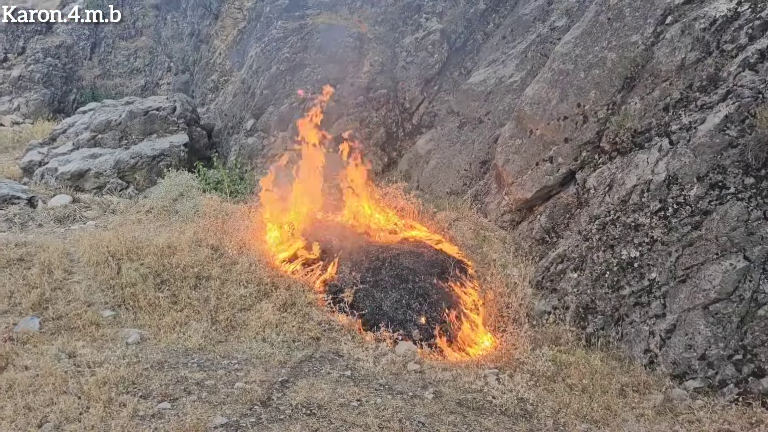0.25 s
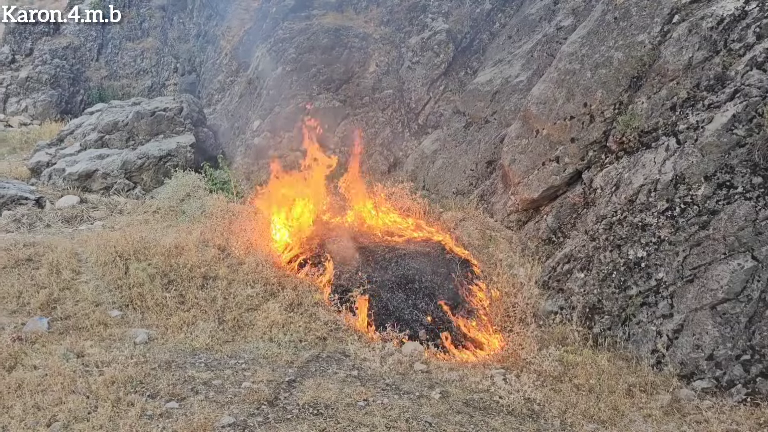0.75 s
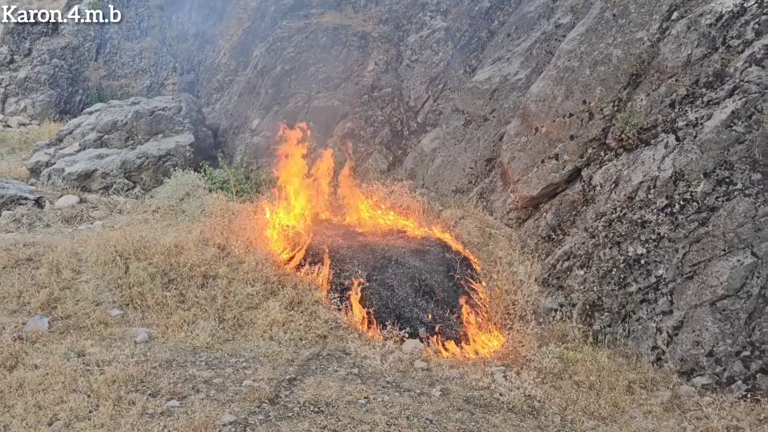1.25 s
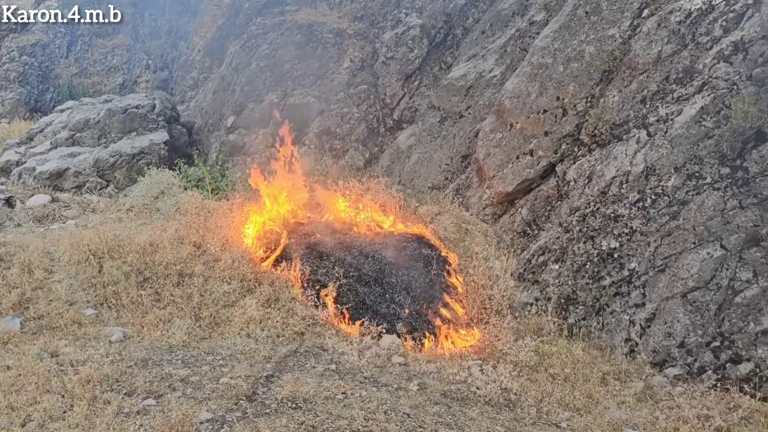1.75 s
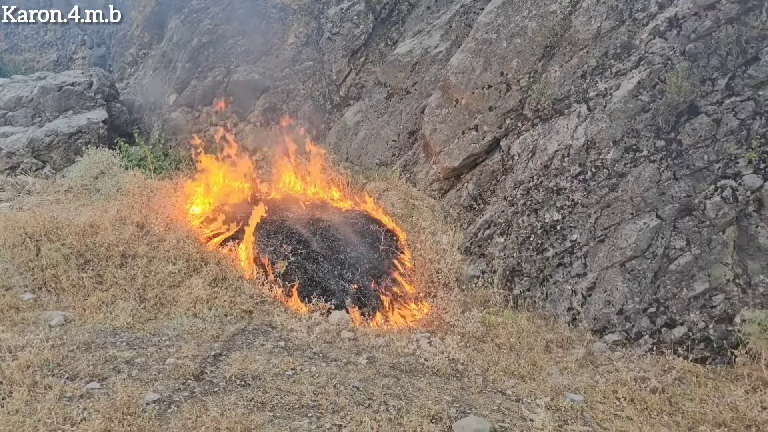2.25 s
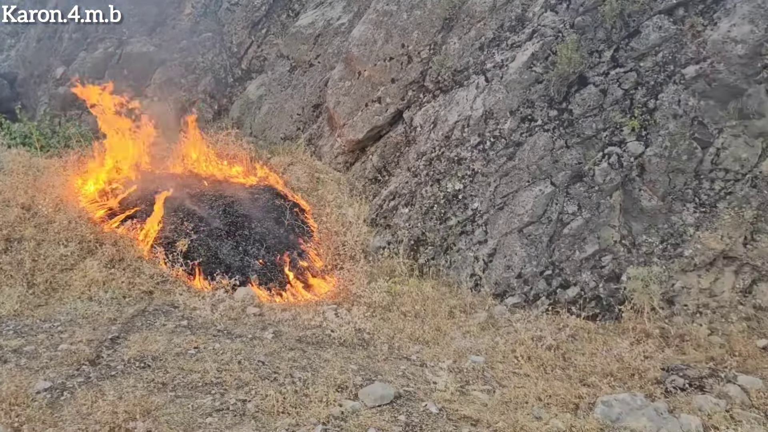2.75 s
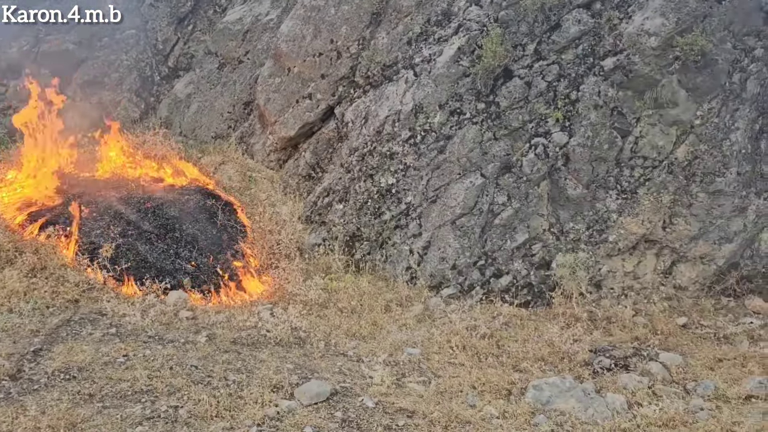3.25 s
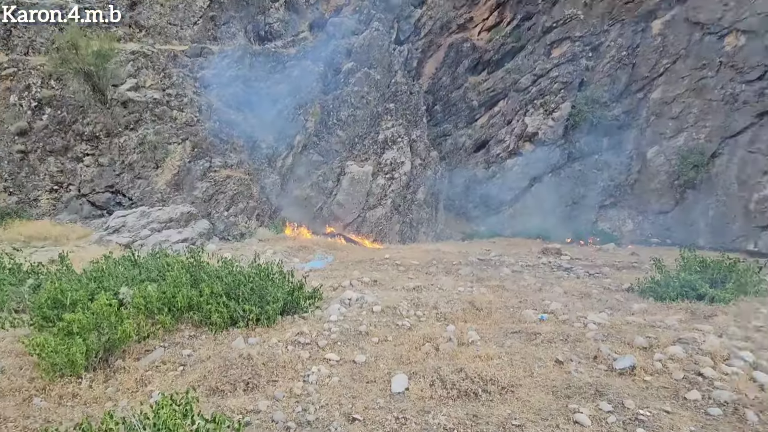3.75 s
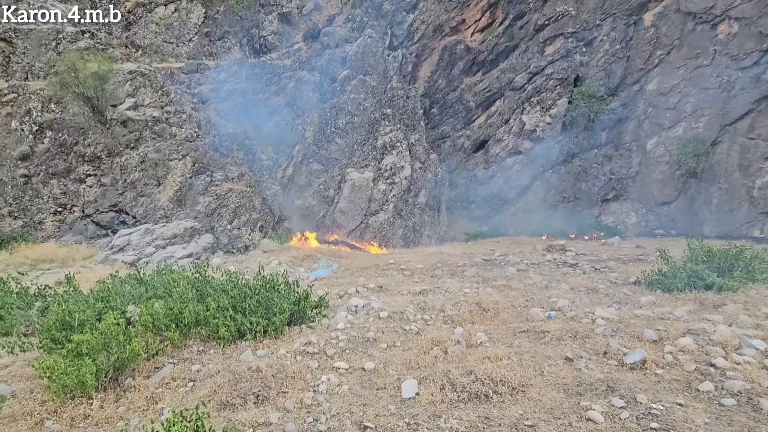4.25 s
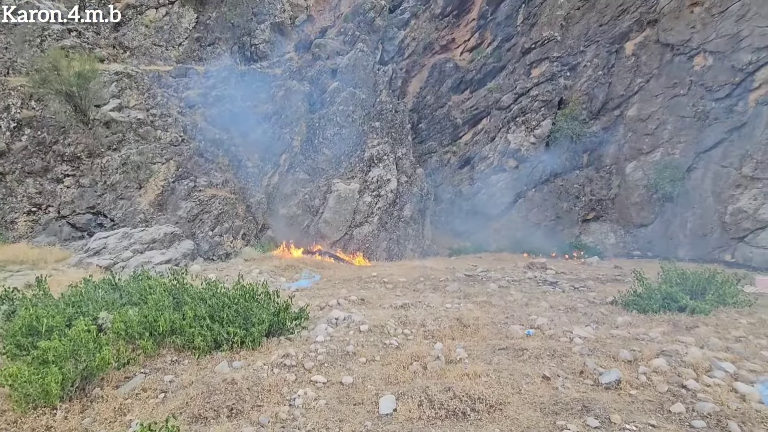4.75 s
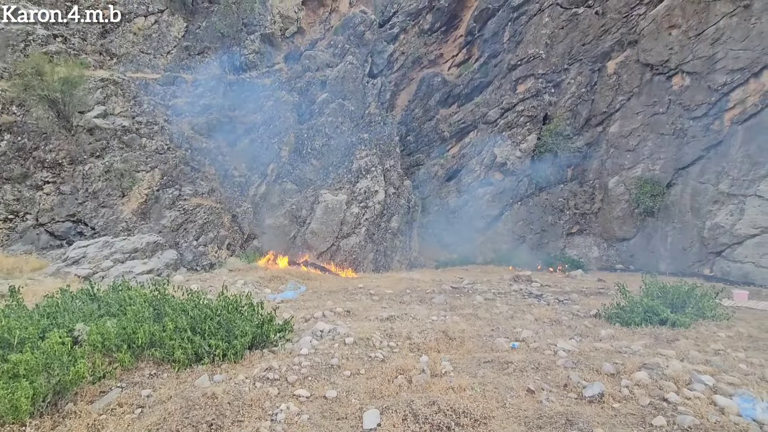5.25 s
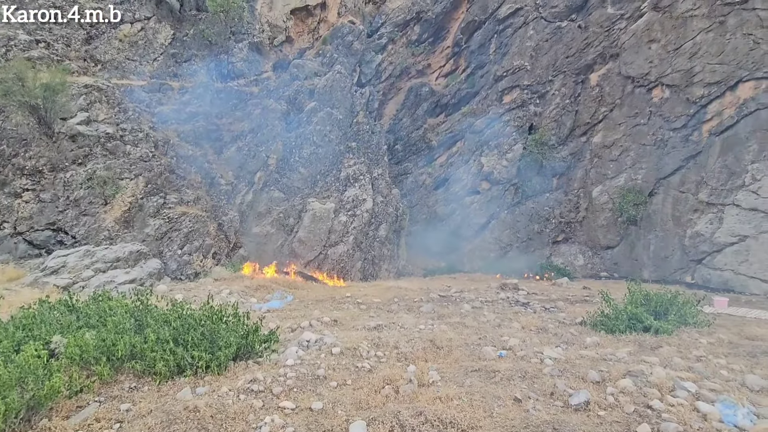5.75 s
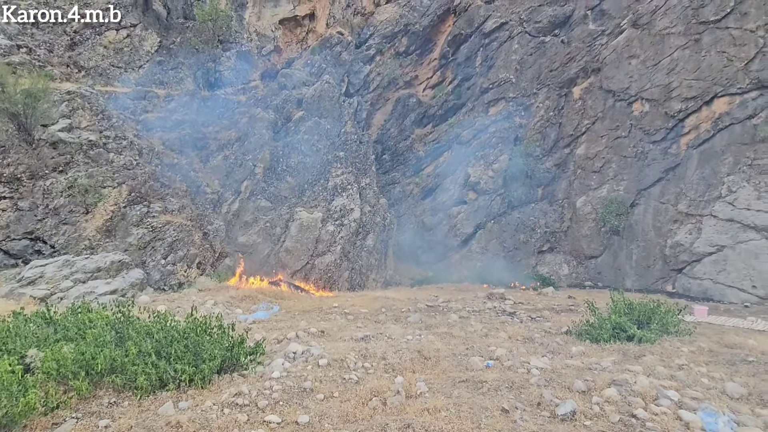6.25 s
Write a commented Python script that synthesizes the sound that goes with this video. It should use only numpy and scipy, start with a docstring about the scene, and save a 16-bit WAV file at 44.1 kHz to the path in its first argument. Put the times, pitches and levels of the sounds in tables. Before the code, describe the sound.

From 0 to about 3.6 seconds, dry grass burns a few steps away: a continuous fizz of tiny snaps, larger clumpy crackles and many loud single pops, some bright and ticking, others duller. Notable pops come near 0.2, 1.8, 2.2 and 2.9 seconds; brief sizzles swell near 0.3, 1.0, 2.7 and 3.3. A soft rush of air lies behind, while low wind rumbles and thumps the microphone, stronger around 1.9 and 3.2. At 3.6 everything falls silent for under a tenth of a second. From 3.7 to 6.5 the fire is distant, quieter and duller, with sparse small pops, ragged echoes from the rock and a fluttering steam hiss that swells around 5.15. Gusts bump near 4.2, 4.6 and 5.3. The crackle brightens after 5.3, one strong pop cracks at 5.84, and a smaller one comes just before the end.

```python
"""Burning dry grass at a rock face

A patch of dry grass burns at the foot of a rock face, heard from a few steps away and,
after a short silent cut, from far off. Heated stalks burst as short bursts of shaped noise:
a fizz of tiny snaps, a crackle of larger ones, single loud pops and brief sizzling flares.
The rock throws them back as a ragged echo in a diffuse tail; steam hisses in the far view.
Behind them filtered noise makes the soft rush of air, the breeze and gusts on two microphone ports.
"""
import sys
import numpy as np
from scipy import signal
from scipy.fft import rfft, irfft
from scipy.io import wavfile
from scipy.ndimage import uniform_filter1d

SR = 44100
rng = np.random.default_rng(int(sys.argv[2]) if len(sys.argv) > 2 else 0)


def master_out(mix):
    """Clip the mix to full scale and print it as 16-bit PCM to the path in sys.argv[1]."""
    frames = np.transpose(np.atleast_2d(mix))
    ceiling = np.clip(frames, -1, 1)
    pcm = np.round(ceiling * 32767).astype(np.int16)
    wavfile.write(sys.argv[1], SR, pcm)


N = 286650
TIME = np.arange(N) / SR  # s
HZ = np.fft.rfftfreq(N, 1 / SR)


def amp(db):
    """Decibels to gain."""
    return 10 ** (np.asarray(db) / 20)


def unit(x):
    """Scales to an rms of 1."""
    return x / np.sqrt(np.mean(x ** 2) + 1e-20)


def curve(rows):
    """Joins (time [s], value) rows by straight lines."""
    return np.interp(TIME, *np.transpose(rows))


def spectrum(rows, hz):
    """Reads each column of a table on a log-frequency axis."""
    f, *columns = np.transpose(rows)
    return np.array([np.interp(np.log(hz + 1), np.log(f), c) for c in columns])


def colour(x, rows):
    """Filters by a table of (frequency [Hz], gain [dB]), with one gain column or one for each port."""
    return irfft(rfft(x) * amp(spectrum(rows, HZ)), N)


def drift(rate_hz):
    """Slow chance with an rms of 1: noise without its faster part."""
    slow = rfft(rng.standard_normal(N)) * np.exp(-(HZ / rate_hz) ** 2)
    return unit(irfft(slow, N))


def share(a, b, alike):
    """Spectra at two ports: the second takes the part `alike` (0-1) from the first."""
    return np.array([a, alike * a + np.sqrt(1 - alike ** 2) * b])


def noise_pair(alike):
    """White noise at two ports that share a part of it."""
    a, b = rfft(rng.standard_normal((2, N)))
    return irfft(share(a, b, alike), N)


def add(mix, s, sound):
    """Mixes a sound in at time s."""
    part = mix[:, max(round(s * SR), 0):][:, :sound.shape[1]]
    part += sound[:, :part.shape[1]]


GROUND_S, GROUND_ECHO = .00149, 0.48  # bounce off the ground: middling delay [s], strength [gain]


def snap(t60, body_db, top_db, direct=0.26, spike=0.51, size=1024):
    """One stalk bursts: a sharp crack, smeared by straw and stones, and its bounce off the ground."""
    t, hz = np.arange(size) / SR, np.fft.rfftfreq(size, 1 / SR)
    shared, *own = rng.standard_normal((3, size))
    scatter = direct * shared + np.sqrt(1 - direct ** 2) * np.array(own)
    # the stalk tears in fits, so the decay is ragged
    ragged = amp(3 * unit(uniform_filter1d(rng.standard_normal(size), 40)))
    # the first half millisecond comes straight from the stalk to both ports
    crack = spike * shared * np.exp(-(t / .0005) ** 2)
    smear = ragged * scatter * 1e-3 ** (t / max(t60, .001))
    attack = np.minimum(t / .0003, 1)
    burst = rfft((crack + smear) * attack)
    # the crack is broadband; only the stalk colours it
    burst = burst / np.sqrt(uniform_filter1d(abs(burst) ** 2, size=60) + 1e-12)
    stalk = [(150, body_db - 5.5), (1300, body_db), (3800, -1.05), (7000, 1), (11500, top_db)]
    tone = amp(spectrum(stalk, hz))
    lead_in = np.exp(-2j * np.pi * hz * 16 / SR)  # 16 samples of room before the onset
    bounce = 1 + GROUND_ECHO * np.exp(-2j * np.pi * hz * GROUND_S * rng.uniform(.88, 1.12))
    fade_out = np.minimum(4 * (1 - t / t[-1]), 1)
    burst = irfft(burst * tone * (lead_in * bounce)) * fade_out
    return burst / np.sqrt(np.sum(burst ** 2) / 2)


def snaps(per_s, spread_db, cap, t60, clump_db, vary_db=3, count=120):
    """A random shower of snaps of many colours and sizes, coming in clumps as tufts catch."""
    rate = per_s * amp(clump_db * drift(15))
    size = amp(spread_db * np.minimum(rng.exponential(1, N), cap))
    kind = rng.integers(0, count, N)
    out = np.zeros((2, N + SR))
    grains = []
    for body, top, length in rng.standard_normal((count, 3)):
        grains.append(snap(t60 * np.exp(0.076 * length), vary_db * (body - top / 2), vary_db * top))
    for i in np.flatnonzero(rng.random(N) < rate / SR):
        grain = grains[kind[i]]
        out[:, i:i + grain.shape[1]] += size[i] * grain
    return unit(out[:, :N])


# how hard the fire burns close by, before its colour: (time [s], level [dB])
BLAZE_NEAR = [(0, -47.5), (.55, -49.5), (1.56, -50.5), (2.7, -49), (3.15, -50.5), (3.58, -52)]
# colour of the near crackle at each port: (frequency [Hz], left gain [dB], right gain [dB])
COLOUR_NEAR = [(300, -31, -11), (900, 2.5, -7.5), (1370, 1.5, 3), (2200, 1, 3), (3600, 3.5, 4),
               (6040, 1, 6), (8300, 0.5, 2.5), (8960, 1.5, -3.5), (11250, -7, 1.5), (11700, -0.5, 11.5),
               (12100, 3.5, -1), (16000, -1, -0.5)]


def fire_near():
    """Close by, separate snaps stand out of the fizz of the burning blades."""
    fizz = snaps(per_s=1600, spread_db=2.8, cap=3, t60=.005, clump_db=1.8, vary_db=2)
    crackle = snaps(per_s=150, spread_db=4.4, cap=2.3, t60=.007, clump_db=2.8, vary_db=3)
    fire = amp(-1) * fizz + amp(0.66) * crackle
    return amp(curve(BLAZE_NEAR)) * colour(fire, COLOUR_NEAR)


# how hard the fire burns as heard from afar, before its colour: (time [s], level [dB])
BLAZE_FAR = [(3.69, -57.5), (4.2, -60), (5, -55), (5.35, -62), (6.5, -60.5)]
# colour of the far crackle at each port: (frequency [Hz], left gain [dB], right gain [dB])
COLOUR_FAR = [(300, -25, -44), (856, 9, 6.5), (1480, -1, 8), (2580, -9, 5.5), (3600, -3, -2.5),
              (5800, -8, 1.5), (7600, -6, -3), (7960, -7, -7), (10800, -7, -14.5), (11300, -3.5, 3),
              (13100, -7, -9), (16000, -7.5, -7)]
# the layer added on top as the treble opens up towards the end: (frequency [Hz], gain [dB])
LATE_TOP = [(4000, -25), (7400, 1), (9000, 2), (10500, -27), (11800, -7), (13500, 6), (16000, 1)]


def fire_far():
    """From afar the fizz is duller and only the larger snaps carry."""
    fizz = snaps(per_s=2000, spread_db=2.2, cap=3, t60=.01, clump_db=1.5, vary_db=1.5)
    crackle = snaps(per_s=80, spread_db=4.2, cap=2.3, t60=.007, clump_db=3, vary_db=2)
    crackle = colour(crackle, [(1500, -2), (5000, 13.0), (14000, 9)])  # the snaps are thinner than the fizz
    fire = colour(amp(3.0) * fizz + amp(-3.5) * crackle, COLOUR_FAR)
    # towards the end the flames stand higher and the top of the crackle brightens
    risen = curve([(5.25, 0), (5.6, 1)])
    return amp(curve(BLAZE_FAR)) * (fire + risen * colour(fire, LATE_TOP))


# loud pops of bursting stalks, thin ones bright and thick ones dull, levels over POP_S before port colour:
# (time [s], level [dB], brightness [dB])
POPS = [(0.0515, -37.5, -5), (.064, -34, 13), (.072, -35.5, 0), (0.087, -33.5, 6), (.11, -38, 8),
        (0.1886, -31, 7), (.361, -38.5, 1), (0.4129, -32, -31), (.495, -34.5, 15), (0.8604, -39, -21),
        (0.993, -34, 1), (1.0532, -38, 0), (1.1257, -37, 8), (1.1544, -37.5, 3), (1.327, -42, 21),
        (1.371, -34.5, -2), (1.736, -38, -10), (1.7668, -27.5, 18), (1.7741, -33, 5), (1.8326, -35.5, 21),
        (1.867, -34.5, -3.5), (1.9606, -37, 5), (2.052, -35, 20), (2.0747, -34.5, 3), (2.1746, -32.5, 1),
        (2.2002, -28.5, 6.5), (2.4168, -35, -45), (2.476, -36.5, -3), (2.517, -36.5, 21),
        (2.645, -31.5, -12), (2.652, -42, -4), (2.7991, -35.5, 13.5), (2.9411, -29.5, -17),
        (2.946, -35, 21), (3.0264, -38.5, 5), (3.3118, -36.5, 11.5), (3.4592, -34.5, 2), (3.813, -44, 13),
        (3.8566, -41, -10), (3.9773, -41.5, 0), (4.164, -45, 7), (4.222, -42.5, -6), (4.508, -41, -16),
        (4.784, -46, 14), (4.8013, -43, 5), (5.6011, -42, 5), (5.704, -44, -6), (5.8418, -28, -2.5),
        (5.9196, -45, -15), (6.4549, -36, -3.5)]
POP_S = .005  # span that a pop's level refers to [s]
POP_T60, POP_SHORTER_PER_DB = 0.0079, 0.32  # middling stalk [s]; bright ones die sooner [dB of t60 per dB]
# body and top against the 5 kHz crack [dB]; share of the brightness that lifts the top
POP_BODY_DB, POP_TOP_DB, POP_TOP_SHARE = -6, -4, 0.7


def pops():
    """The loudest bursts: the thinner the stalk, the brighter and shorter its crack."""
    out = np.zeros((2, N))
    for s, db, bright_db in POPS:
        t60 = POP_T60 * amp(-POP_SHORTER_PER_DB * bright_db)
        body_db = POP_BODY_DB - (1 - POP_TOP_SHARE) * bright_db
        top_db = POP_TOP_DB + POP_TOP_SHARE * bright_db
        pop = snap(t60, body_db, top_db)
        add(out, s - .0003, amp(db) * np.sqrt(POP_S * SR) * pop)  # starts early by about the snap's lead-in
    # the ports differ on the pops as they differ on the crackle
    ports = spectrum(COLOUR_NEAR, HZ)
    return irfft(rfft(out) * amp(ports - ports.mean(0)), N)


# tufts that flare up in a brief sizzle, level at the peak of each swell: (time [s], level [dB])
FLARES = [(.242, -41.5), (.301, -43), (1.01, -44), (1.135, -50), (2.658, -40.5), (2.847, -47.5),
          (2.965, -46), (3.243, -44), (3.342, -40.5)]
FLARE_S = 0.018  # a swell is 17 dB down this long before and after its peak [s]


def flares(body_db=-4):
    """A tuft catches: a dense run of tiny snaps swells and fades."""
    swell = sum(amp(db) * np.exp(-2 * ((TIME - s) / FLARE_S) ** 2) for s, db in FLARES)
    sizzle = snaps(per_s=900, spread_db=3, cap=2.5, t60=.004, clump_db=1, vary_db=1.5)
    sizzle = colour(sizzle, [(1500, body_db), (5500, 4.0), (14000, -4.5)])
    return swell * unit(colour(sizzle, COLOUR_NEAR))


# steam hissing out of the distant stalks, around which it flutters: (time [s], level [dB])
STEAM = [(3.7, -59.5), (4.35, -68), (5.15, -56), (5.3, -78), (5.6, -61.5), (6, -72), (6.5, -58)]


def steam(centre_hz=5900, width_hz=1500, left_db=-7):
    """Tiny spits merge into a narrow, fluttering hiss, stronger at the right port."""
    band = 1 / (1 + (2 * (HZ - centre_hz) / width_hz) ** 2)
    spits = snaps(per_s=700, spread_db=2.5, cap=2.5, t60=.01, clump_db=2, vary_db=1)
    hiss = irfft(rfft(spits) * band, N) * amp([[left_db], [0]])
    return unit(hiss) * amp(curve(STEAM) + 2.3 * drift(40))


# the fire lies to the left, so the right port hears it later; more so once the microphone turns:
# (time [s], delay [s])
PORT_LAG = [(2.2, .0001), (2.6, .00038)]


def from_left(x):
    """Delays the right port by the extra path of sound from the left."""
    late = np.arange(N) - np.round(curve(PORT_LAG) * SR).astype(int)
    return np.array([x[0], x[1, np.clip(late, 0, N - 1)]])


# decay of the scatter off the rock: (frequency [Hz], t60 [s])
ROCK_T60 = [(500, 0.083), (5000, 0.12), (14000, 0.038)]


def rock(x, delay, echo_db, scatter_db, echo_t60=.03, size=16384):
    """The rock face returns one ragged echo within a short diffuse tail."""
    t = np.arange(size) / SR
    hz, at, z = signal.stft(rng.standard_normal((2, size)), SR, nperseg=256)
    z = z * 1e-3 ** (at / spectrum(ROCK_T60, hz).T)  # each band of the noise dies at its own pace
    tail = signal.istft(z, SR, nperseg=256)[1][:, :size] * (t > .002)
    echo = rng.standard_normal((2, size)) * (t > delay) * amp(-60 * abs(t - delay) / echo_t60)
    response = (amp(scatter_db) * unit(tail) + amp(echo_db) * unit(echo)) / np.sqrt(size)
    return signal.oaconvolve(x, response, axes=1)[:, :N]


# rush of the air and the flames, around which it flutters: (time [s], level [dB])
RUSH = [(0, -49.5), (1.3, -49.5), (1.6, -52.5), (2.9, -50), (3.7, -53), (4.55, -53.5), (5.2, -52),
        (6.5, -52.5)]
# relative spectrum of the rush: (frequency [Hz], density [dB per Hz])
RUSH_COLOUR = [(40, -34), (120, 7.5), (270, 5.5), (390, 0), (560, 2.5), (780, 1), (1000, -6.5),
               (1350, -4.5), (1700, -9.5), (3000, -11.5), (8000, -20), (16000, -42)]
# likeness of the rush at the two ports: (frequency [Hz], likeness [0-1])
RUSH_ALIKE = [(100, 1), (400, 0.92), (800, 0.4), (1200, 0), (4000, 0)]


def rush():
    """A soft, slightly fluttering rush of air: noise that the ports share only at low pitch."""
    air = unit(colour(noise_pair(spectrum(RUSH_ALIKE, HZ)[0]), RUSH_COLOUR))
    return air * amp(curve(RUSH) + 1.3 * drift(40))


# steady wind on the microphone in the near and the far view, before its sway: (time [s], level [dB])
BREEZE_NEAR = [(0, -49), (1.15, -52), (1.5, -48.5), (1.93, -42), (2.22, -51.5), (2.72, -53.5), (3.2, -43.5),
               (3.58, -51)]
BREEZE_FAR = [(3.69, -64.5), (4.1, -45.5), (4.35, -52.5), (4.7, -49.5), (4.95, -58), (5.3, -49),
              (6.5, -51.5)]
# relative spectrum of the wind: (frequency [Hz], density [dB per Hz])
WIND_COLOUR = [(10, -10), (25, -12), (55, 5), (80, -1), (130, -5.5), (200, -23), (300, -28), (500, -24),
               (1200, -58), (4000, -100)]
# big eddies cover both ports, small ones only one: (frequency [Hz], likeness [0-1])
WIND_ALIKE = [(40, 0.93), (90, 0.77), (170, 0.47), (400, 0.1)]


def wind(steady_s=0.094):
    """The breeze rumbles on both ports, nearly alike at the bottom, and shifts from one to the other."""
    rumble = colour(noise_pair(spectrum(WIND_ALIKE, HZ)[0]), WIND_COLOUR)
    # evens out the rumble's own swings over steady_s
    rumble = rumble / np.sqrt(uniform_filter1d((rumble ** 2).mean(0), int(steady_s * SR)))
    sway = amp(2.3 * np.array([drift(7.5), drift(26)]))  # slow at the left port, faster at the right
    return amp(curve([*BREEZE_NEAR, *BREEZE_FAR])) * sway * rumble


# eddies that thump the microphone, each played 2.5 dB below its listed level:
# (time [s], level [dB], length [s], centre [Hz])
GUSTS = [(0.573, -36, .027, 101), (.748, -32.5, 0.037, 93), (0.974, -35.5, 0.038, 100),
         (1.295, -36, 0.04, 104), (1.441, -31, 0.031, 85), (1.542, -37, 0.054, 63),
         (1.654, -32.5, 0.034, 56), (2.034, -34, 0.055, 82), (2.332, -32.5, 0.032, 92),
         (2.452, -40.5, 0.16, 72), (2.939, -39.5, .036, 81), (3.13, -35.5, 0.083, 85),
         (3.3, -31, 0.016, 74), (3.528, -36.5, 0.057, 70), (4.081, -37, .045, 72.4),
         (4.166, -33, 0.031, 53.6), (4.468, -34.5, 0.029, 60.5), (4.559, -39, 0.055, 56),
         (4.619, -30.5, 0.017, 60), (5.242, -35, 0.037, 100), (5.339, -33.5, 0.026, 66.4),
         (5.718, -41.5, 0.067, 82)]


def gusts(top_slope=2.9, low_slope=1.12, skirt=0.36, flutter_db=-15.5, flutter_hz=290, size=16384):
    """Each eddy is a short swell of low turbulence; small fast ones add a flutter higher up."""
    t, hz = (np.arange(size) - size / 2) / SR, np.fft.rfftfreq(size, 1 / SR)
    alike = spectrum(WIND_ALIKE, hz)[0]
    out = np.zeros((2, N))
    for s, db, length, centre_hz in GUSTS:
        a, b = rfft(rng.standard_normal((2, size)))
        ratio = hz / centre_hz + 1e-6
        band = 1 / np.sqrt(ratio ** (-2 * low_slope) + ratio ** (2 * top_slope))
        flutter = amp(flutter_db) * (centre_hz / 100) ** 3 / (1 + (hz / flutter_hz) ** 4)
        eddy = irfft(share(a, b, alike) * np.hypot(band, flutter))
        core = np.exp(-2 * (t / length) ** 2)
        eddy = eddy * (core + skirt * np.exp(-(t / (2 * length)) ** 2))
        core_rms = np.sqrt(np.average((eddy ** 2).mean(0), weights=core))
        add(out, s + t[0], amp(db - 2.5) * eddy / core_rms)
    return out


CUT_FROM, CUT_TO = 3.592, 3.675  # the silence between the two views [s]


def scene():
    """The near view, a moment of silence, then the far view."""
    bursts = pops() + flares()
    is_near, is_far = TIME < CUT_FROM, np.clip((TIME - CUT_TO) / 0.024, 0, 1)
    near = from_left(fire_near() + bursts)
    far = from_left(fire_far() + bursts) * is_far
    near = near + rock(near, delay=.008, echo_db=-31, scatter_db=-13.0)
    far_echo = rock(far, delay=0.025, echo_db=-12.5, scatter_db=-13.5, echo_t60=0.087)
    far = far + colour(far_echo, [(6000, 0), (14000, -5)])
    air = rush() + wind() + gusts()
    # out in the open the wind is deeper and the rush has more body
    open_air = colour(air, [(50, 2.5), (140, -1.5), (330, 0), (700, -0.5), (1500, 2.5), (4000, 2.0)])
    return is_near * (near + air) + is_far * (far + steam() + open_air)


def record(dry):
    """The recorder's band limit: a steep low-pass at 16 kHz."""
    low_pass = signal.firwin(511, 16000, window=("kaiser", 9), fs=SR)
    return signal.oaconvolve(dry, low_pass[None], "same", axes=1)


dry = scene()
out = record(dry)
master_out(out)
```